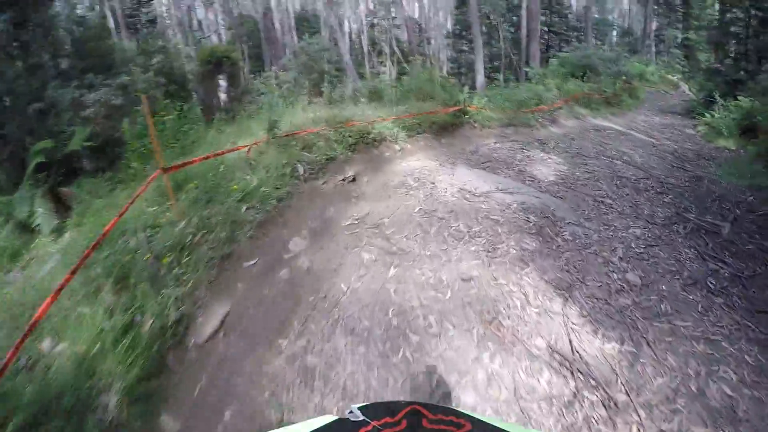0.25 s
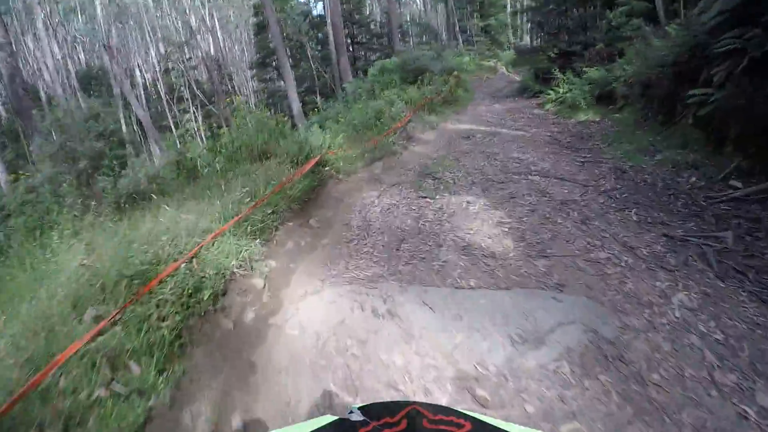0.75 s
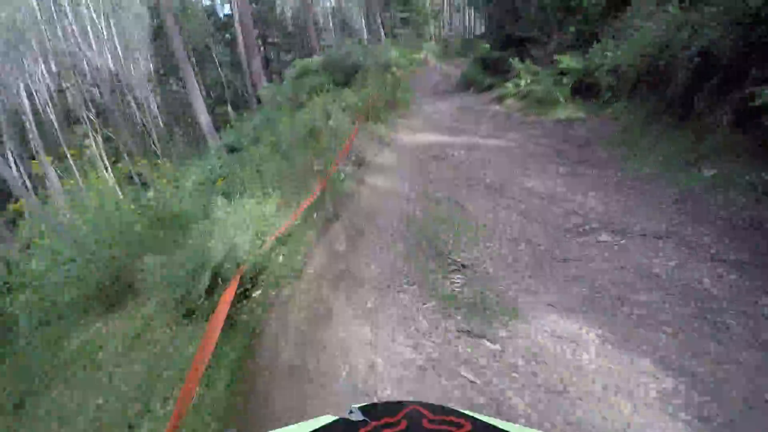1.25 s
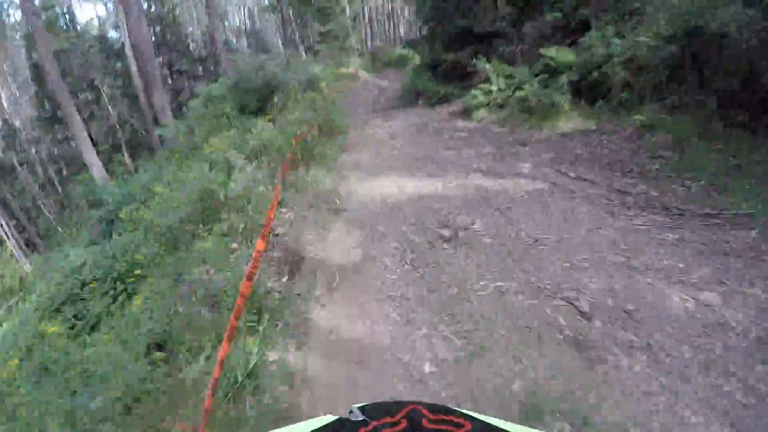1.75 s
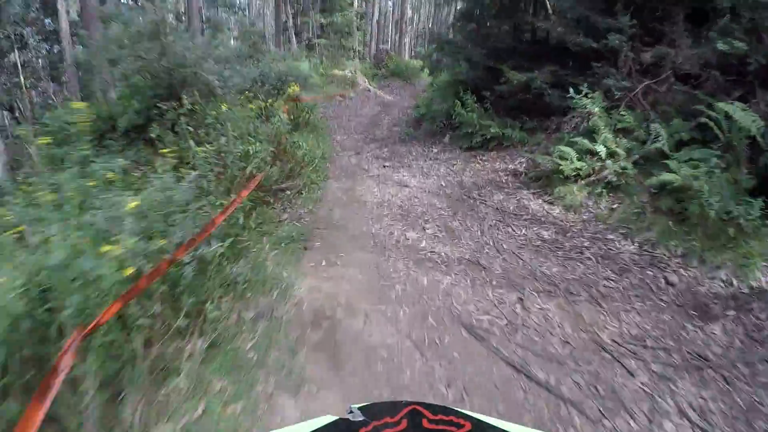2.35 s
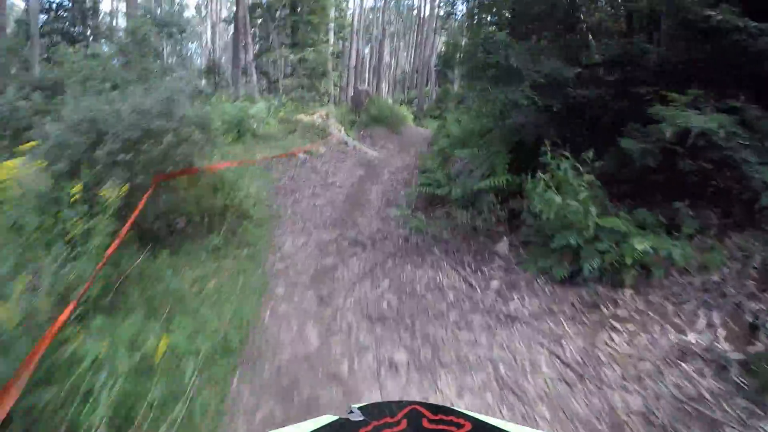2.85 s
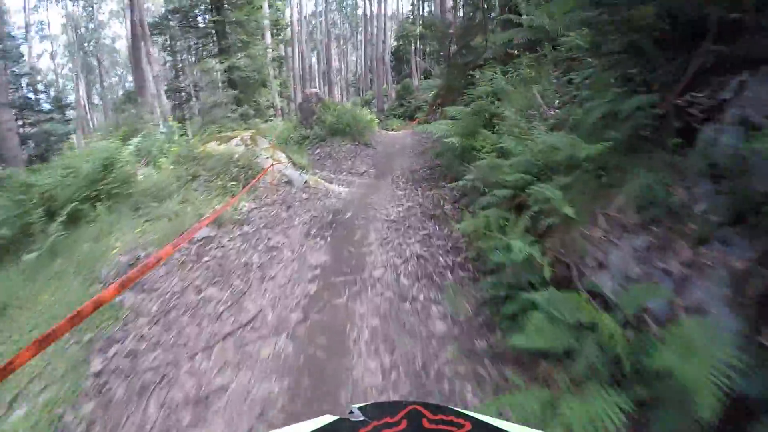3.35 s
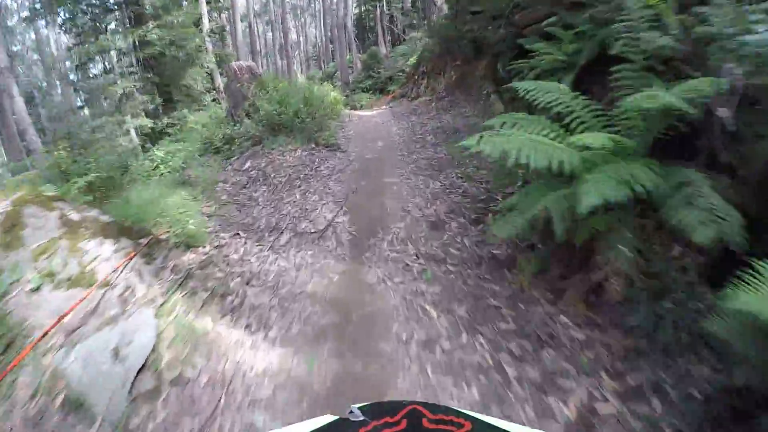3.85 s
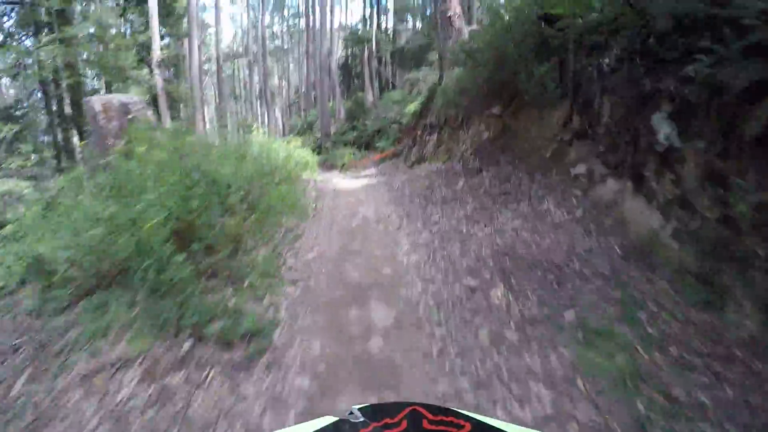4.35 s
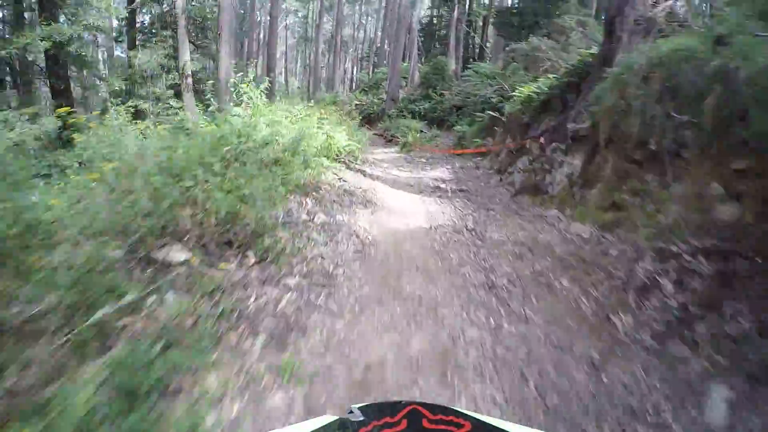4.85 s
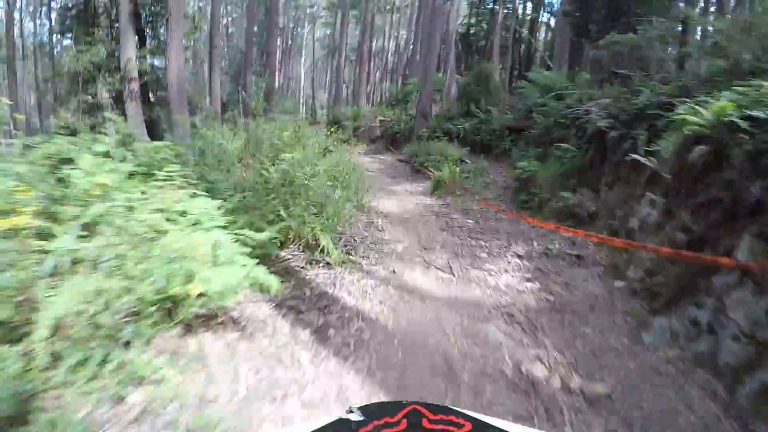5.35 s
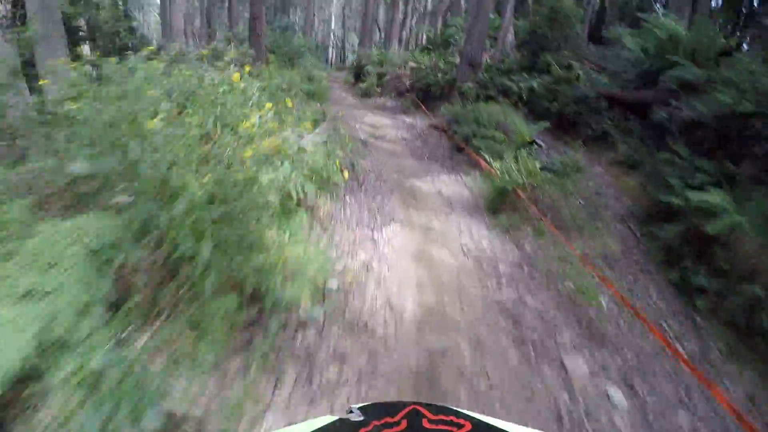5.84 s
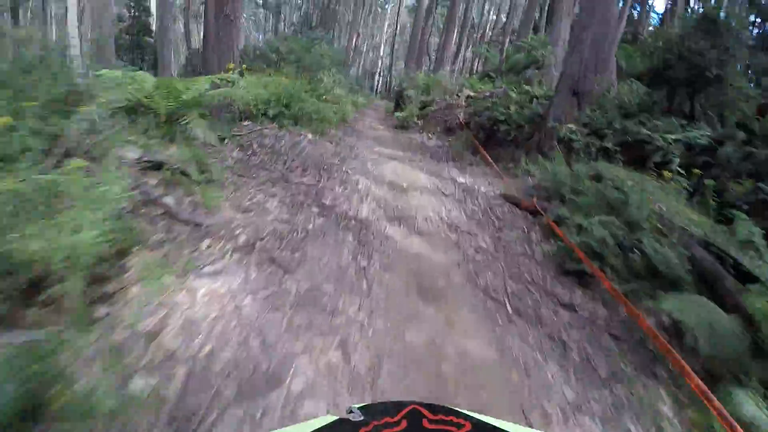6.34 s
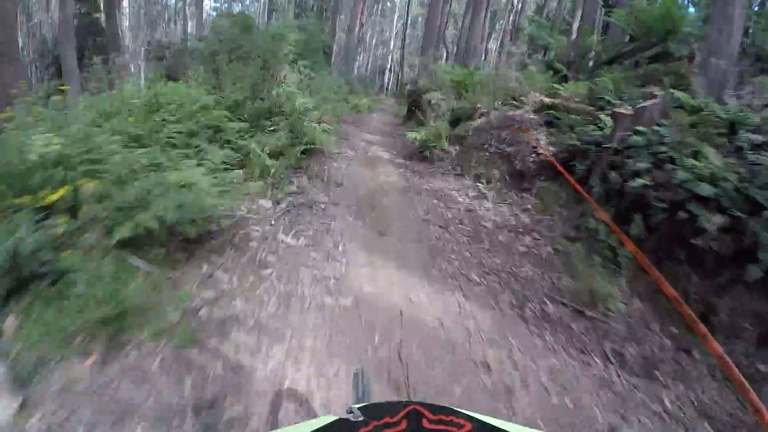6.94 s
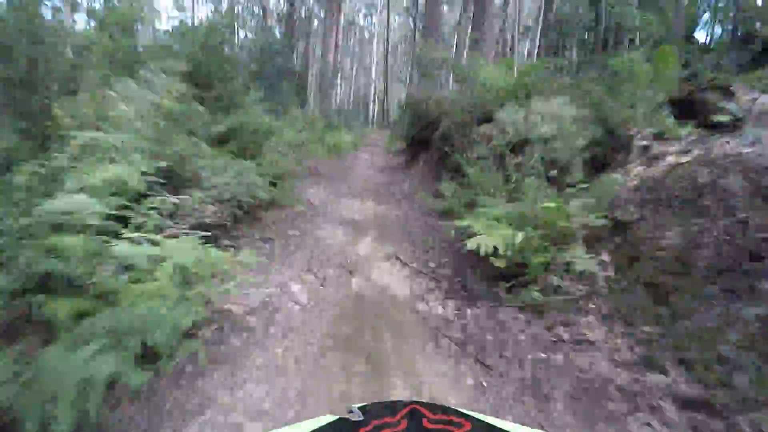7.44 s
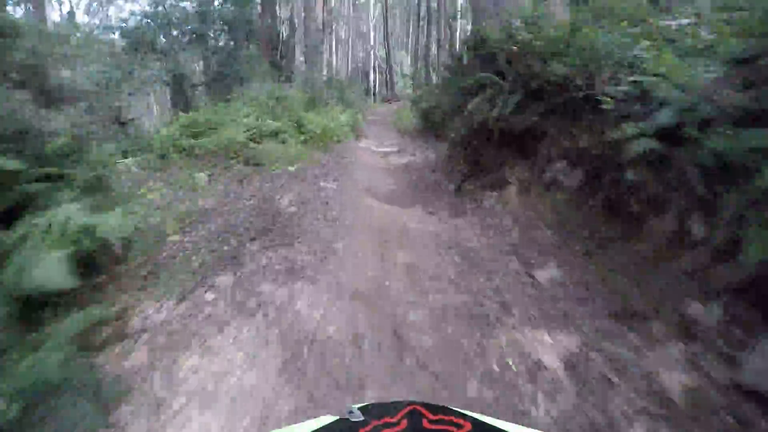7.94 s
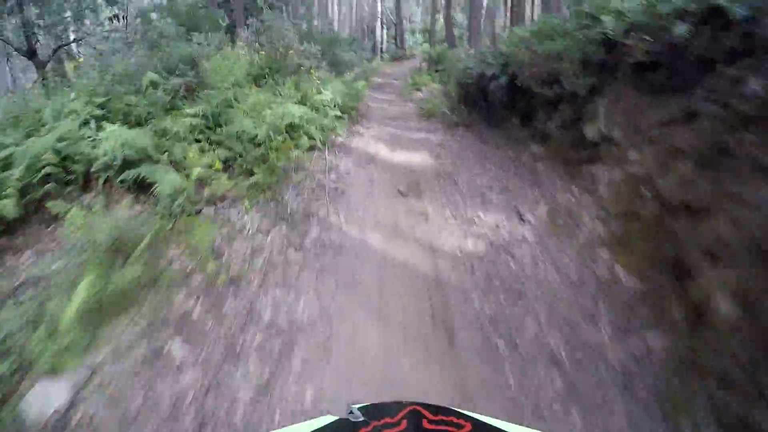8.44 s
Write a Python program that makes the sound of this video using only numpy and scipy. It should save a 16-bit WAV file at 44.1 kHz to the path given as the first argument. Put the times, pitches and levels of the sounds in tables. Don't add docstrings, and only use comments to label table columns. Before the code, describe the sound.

Low muffled rumbling and rising airy hiss on a fast dirt-trail bike ride, early frame knocks and grit ticks, then a loud bright snap past midway.

```python
import sys
import numpy as np
from scipy import signal
from scipy.fft import rfft, irfft, next_fast_len
from scipy.io import wavfile
from scipy.ndimage import uniform_filter1d, map_coordinates

SR = 44100
rng = np.random.default_rng(int(sys.argv[2]) if len(sys.argv) > 2 else 0)


def ratio_of_db(decibels):
    return 10 ** (np.asarray(decibels, float) / 20)


def wav_record(signal):
    frames = np.transpose(np.atleast_2d(signal))
    bounded = np.clip(frames, -1, 1)
    quanta = np.round(bounded * 32767).astype(np.int16)
    wavfile.write(sys.argv[1], SR, quanta)


N = 383229

# (time [s], air stream in the port [dB], head turn as fizz over the stream [dB])
RIDE = [(0, -54, -8), (.35, -62, -6.5), (.9, -61.5, -12), (1.1, -54, -15), (1.7, -42, -18.5),
        (1.95, -40.5, -20.5), (2.5, -37, -20), (3.0, -31, -20), (4.48, -34.5, -19), (4.56, -37.5, -19.5),
        (5.3, -33.5, -15.5), (5.45, -30.5, -15.5), (6.2, -27, -15.5), (6.5, -27.5, -15), (6.9, -33, -15.5),
        (7.4, -23.5, -18.5), (8.0, -22.5, -18.5), (8.69, -27, -16.5)]
# (time [s], level over it [dB], half length [s])
GUSTS = [(.05, -7, 0.034), (.2, 2, 0.047), (.43, 9, 0.015), (.51, 11, 0.046), (.79, 6, 0.1),
         (1.08, 7.5, 0.08), (1.17, -4, 0.026), (1.26, 7.5, 0.053), (1.58, 2.5, 0.024), (1.69, -6, 0.07),
         (2.04, 3.5, 0.054), (2.5, 3.5, 0.13), (2.77, -3, 0.23), (3.5, 2.5, 0.045), (3.72, 1.5, 0.049),
         (4.06, -1, 0.039), (4.32, 6, 0.18), (4.4, -3.5, 0.027), (4.47, 4.5, 0.021), (5.84, -3, 0.15),
         (5.96, 4, 0.032), (6.21, 2.5, 0.098), (6.57, -2, 0.064), (7.53, 4, 0.068), (7.65, -4.5, 0.041),
         (7.81, -2.5, 0.027), (7.92, 4, 0.048), (8.26, -3, 0.028), (8.49, -4, 0.039), (8.58, 3.5, 0.035),
         (2.25, -1, 0.082), (2.91, 1.5, 0.034), (3.87, 1.5, .05), (4.83, 1.5, 0.17), (5.01, 1, 0.089),
         (5.4, 2.5, 0.044), (6.8, 0, 0.08), (7.07, -2.5, .06), (7.3, 0.5, .05), (8.17, 2, 0.039),
         (8.33, 0.5, .05), (1.36, 2, .04), (6.05, 1, .03), (6.42, 2.5, 0.045)]

# (frequency [Hz], density [dB per Hz])
SWAY_SPECTRUM = [(2, -14), (5, -0.5), (12, -1.5), (20, -0.5), (28, 0), (40, -5), (50, -8.5), (60, -26),
                 (75, -46)]
# (time [s], level over rest [dB], half length [s])
SWINGS = [(0, 14.5, 0.0075), (.25, -13, 0.055), (.36, 8.5, 0.022), (.46, 11.5, 0.03), (.6, 8.5, 0.015),
          (1.09, 6, 0.029), (1.23, 5, 0.069), (1.38, 5.5, 0.036), (1.52, 12, 0.031), (2.07, 10.5, 0.027),
          (2.71, 10, 0.03), (3.02, 6, 0.038), (3.36, 7.5, 0.024), (4.08, 11.5, 0.042), (4.33, 5, 0.16),
          (4.81, 11, 0.034), (1.82, 3.5, 0.11), (5.38, 9, 0.031), (5.72, 4, 0.11), (5.95, 13, 0.018),
          (6.12, 7, 0.024), (6.24, 16, 0.01), (6.43, 11, 0.047), (6.69, 9.5, 0.046), (6.85, 17, 0.0076),
          (7.22, -15.5, 0.26), (7.46, 17.5, 0.055), (7.96, 11, 0.032), (8.2, 9, 0.026), (8.62, 7.5, 0.038),
          (.69, -3.5, 0.036), (1.55, -3.5, 0.045), (3.15, -6, 0.092), (3.45, 2.5, 0.036), (3.63, -6, 0.063),
          (4.65, -4, 0.055), (5.19, 0.5, 0.039), (5.61, 1.5, 0.035), (6.28, -0.5, 0.028), (6.08, -3, 0.033),
          (7.2, 3.5, .03), (8.56, 2.5, 0.027), (7.35, 9, 0.02), (2.2, 2, 0.023), (8.39, 4, 0.042)]
# (time [s], level [dB])
PAUSES = [(.05, -7), (.65, -8), (.99, -13), (1.14, -11), (1.31, -7.5), (1.6, -7), (2.13, -6), (2.27, -16),
          (2.35, -4), (2.49, -19), (2.63, 9), (2.66, -16), (3.32, -12), (3.43, -9), (3.48, 1.5),
          (3.87, -11), (4.16, -6), (4.55, -17), (4.67, 6.5), (4.76, -17), (4.94, -13), (5.08, 4),
          (5.91, -22), (6.9, -5), (6.97, -13), (7.04, 11), (8.08, -17), (8.3, -9), (8.38, 5), (8.47, -11)]
PAUSE_S = 0.026
STROKE = .72
# (frequency [Hz], width [Hz], level [dB])
MOUNT_MODES = [(89.2, 21, 0.5), (78, 44, -1), (62.4, 40, -3), (50.5, 18, -8.5)]
# (time [s], level over rest [dB], half length [s])
BUMPS = [(.09, -17, 0.044), (.24, 3, .04), (.44, 19, 0.11), (8.5, -1, 0.044), (1.35, 2.5, 0.14),
         (1.72, 7.5, 0.032), (2.09, 9, 0.056), (2.22, 4.5, .04), (2.39, 6.5, 0.1), (2.54, 10.5, 0.04),
         (2.98, 6.5, 0.11), (3.15, 2, .04), (3.27, 7, 0.042), (3.82, 9, 0.098), (4.31, 4, 0.068),
         (4.45, 23, 0.027), (4.55, -4, 0.034), (5.55, 4, 0.11), (5.95, 12, 0.055), (6.22, 14, 0.029),
         (6.5, 0, 0.13), (6.66, 12, 0.11), (6.85, 12, 0.028), (7.0, -6, 0.041), (7.28, 7, 0.078),
         (7.45, 15.5, 0.062), (7.71, 9, 0.021), (7.89, 14, 0.024), (8.18, 3, 0.027), (8.37, 17, 0.035),
         (.33, -10, .04), (.63, -6, 0.043), (1.05, -10, 0.066), (1.53, 0.5, 0.046), (7.54, 6, 0.066),
         (3.63, 2, 0.051), (4.9, 2.5, 0.18), (5.1, 5, .06), (5.4, 1, .04), (2.75, 2, 0.081),
         (8.02, -2, .04), (8.62, -3, .04), (4.08, 0, .04), (1.22, 6, .04), (8.53, 7, 0.055),
         (3.93, 0, 0.042)]
# (frequency [Hz], density [dB per Hz])
ROAR_SPECTRUM = [(68, -63), (115, 6.5), (123, -0.5), (312, -9.5), (415, -9.5), (570, -13.5), (900, -19.5),
                 (1170, -11), (1980, -120)]
# (time [s], level [dB], half length [s])
CROSSWIND = [(2.99, -5.5, .04), (6.03, -1.5, .05), (1.9, -5, .04), (2.85, 3.5, .05), (5.0, 3.5, 0.044),
             (4.22, 0, 0.046), (7.33, 6, 0.16), (0.37, 5, 0.068), (.24, -4, .05), (1.72, 1, 0.033),
             (2.1, -2, 0.04), (2.39, 0, 0.037), (3.4, 1, .06), (2.7, -7, 0.033), (3, 6, 0.044),
             (5.3, 3.5, 0.072), (5.7, -2.5, 0.037), (5.2, 2, 0.052), (6.9, -0.5, 0.18), (6.9, -2, .05),
             (8.18, 3.5, 0.046), (8.25, -6, 0.043), (8.69, 2, .06), (0.63, 2, .06), (1.35, 0, 0.052),
             (2.25, 0, .04), (3.63, 0, .06), (4.05, 2, 0.11), (4.17, -1.5, .05), (7.2, 2.5, .04),
             (8.0, 0, 0.065), (5.4, -2, .02), (4.8, 1, .05), (5.27, -2.5, 0.07), (3.1, 2.5, 0.066),
             (4.5, -5, .04), (7.78, 0.5, 0.045), (3.9, 0, 0.051), (1.47, -3, .08)]

# (frequency [Hz], density [dB per Hz])
SHELL_SPECTRUM = [(410, -21), (700, -14), (991, -11.5), (1080, -9), (1450, -7), (1770, -2), (2260, 1),
                  (2720, -3), (2800, -34), (3640, -7), (6160, -120)]
# (frequency [Hz], width [Hz], level [dB])
PORT_MODES = [(3161, 460, 1), (3447, 425, 1.5)]
# (frequency [Hz], density [dB per Hz])
FIZZ_SPECTRUM = [(3600, -23), (4050, -9), (4300, 3), (5000, 3), (6200, -3), (7200, -6), (8200, -10.5),
                 (8900, -14.5), (9600, -41)]
# (frequency [Hz], density [dB per Hz])
AIR_SPECTRUM = [(8300, -14), (8900, 11.5), (9800, 7.5), (10500, 1), (11600, 3), (12600, 1), (13600, -5),
                (15100, -13), (15300, -38)]
# (frequency [Hz], width [Hz], lift [dB])
SLOT_MODES = [(4370, 370, 2.5), (4780, 100, -9), (5620, 190, 4.5), (6400, 150, -9), (7880, 410, -4.5),
              (10540, 240, 9.5), (12600, 500, -3)]
# (time [s], level [dB], half length [s])
GLANCES = [(1.27, 3, .05), (2.05, 1, .15), (2.6, -0.5, .15), (5.05, 0, .1), (1.35, 3, .05), (2.25, 4, .06),
           (3.57, -1.5, .08), (4.35, 1.5, .05), (4.83, 2, .06), (5.79, 0, 0.042), (6.3, 1, 0.18),
           (6.53, -3, .04), (6.81, 2, 0.066), (6.95, -0.5, .06), (7.35, -2.5, 0.078), (7.75, 1, .06),
           (8.25, -1, .1), (8.5, 0.5, .05)]

# (frequency [Hz], density [dB per Hz])
TREAD_SPECTRUM = [(500, -19), (1000, -5.5), (1500, -6), (1850, 4), (2050, -3), (2300, 2), (2600, 3),
                  (2850, -8), (3400, -11), (4000, -16.5), (6500, -30)]
# (time [s], level over rest [dB], half length [s])
CRUNCH = [(0, 10, 0.043), (.13, 7.5, 0.11), (.44, 9, 0.043), (.52, 10.5, .04), (.61, 9, 0.035),
          (.71, 7, 0.047), (1.27, 15, 0.058), (1.75, 15.5, 0.058), (6.62, 15.5, 0.2), (7.07, 14.5, 0.5),
          (7.56, 6, .06), (.08, 2.5, .03), (1.07, 3, .05), (.36, -5, .03), (8.25, 6, .06), (.8, 4, .04)]
# (time [s], peak [dB], upper modes [dB])
KNOCKS = [
    (0.112, -40, -2),
    (0.4155, -51, 6),
    (.51, -49, -6),
    (0.4474, -61, 1),
    (0.627, -57, 11.5),
    (0.6773, -39.5, -1.5),
    (0.897, -39, 3),
    (1.0001, -41.5, 2),
    (1.3117, -50, 6),
    (1.9033, -43, 2),
]
# (frequency [Hz], level [dB], decay t60 [s])
FRAME_MODES = [(1130, 6.5, 0.029), (1330, -3.5, 0.016), (1470, 3, 0.016), (1850, 2, 0.013),
               (2090, 6.5, 0.016), (2500, 2, 0.011), (4080, -9, 0.015)]
# (time [s], peak [dB], centre [Hz], decay t60 [s])
GRIT = [(.19, -51, 4530, .02), (.2204, -51, 4470, .04), (.348, -53, 4200, .03), (.43, -37, 2800, .025),
        (0.441, -46, 5000, .04), (0.446, -34, 2500, 0.034), (.4698, -54, 6000, .036),
        (.482, -48, 7000, 0.022), (0.489, -39, 4300, 0.042), (.493, -57, 11000, .05),
        (.221, -35, 2240, 0.022), (.541, -55, 6000, .02), (0.643, -43, 3800, .02), (.9238, -49, 4700, .03),
        (.27, -57, 6000, .02), (.79, -62, 7000, .015), (.865, -59, 7500, .015), (.997, -42, 1900, .012),
        (1.002, -56, 6500, .015), (1.059, -58, 5500, .02), (1.1243, -57, 7000, .015),
        (1.515, -57, 8000, .015), (1.554, -53, 5530, .015), (1.7434, -56, 5200, .04),
        (1.8706, -53, 5500, .015), (2.0862, -46, 4700, .02), (2.2638, -50, 5500, .015),
        (2.3974, -51, 5500, .015), (1.08, -53, 5000, .04), (1.49, -55, 7000, .02), (1.575, -57, 6500, .04),
        (1.6232, -52, 5500, .015), (1.6901, -51, 6000, .015), (1.7858, -42, 5460, .015),
        (1.8277, -49, 8500, .015), (1.8916, -48, 6000, .015), (2.0867, -49, 7000, .021),
        (2.3111, -54, 12000, 0.011), (2.7272, -53, 8900, .03), (2.94, -59, 9000, .03),
        (.93, -61, 9000, .02), (1.29, -54, 6000, .03), (6.77, -60, 14000, .02), (3.2485, -40, 5900, .017),
        (4.358, -41, 6000, .02), (4.3849, -41, 6000, .02), (4.4694, -54, 6960, .026),
        (8.572, -26, 9750, 0.0053)]
# (time [s], peak [dB], length [s])
JOLTS = [(0.416, -13, 0.0044), (0.471, -16, 0.0057), (0.856, -36, 0.0021), (2.04, -29, 0.003),
         (2.498, -27, 0.0029), (4.36, -42, 0.0039), (4.452, -19, 0.0032), (5.395, -23, 0.0028),
         (6.648, -19.5, 0.0036), (6.743, -26.5, 0.001), (6.845, -29, 0.00096), (7.451, -21, 0.0024)]
# (time [s], level [dB], half length [s])
RUBS = [
    (1.268, -68, .052),
    (1.835, -68, .012),
    (2.235, -73, 0.06),
]
# (frequency [Hz], level [dB], decay t60 [s])
CAP_MODES = [(4830, 4.5, 0.0036), (6900, 6.5, 0.0025), (7900, 3.5, 0.003), (11000, -3.5, 0.0025),
             (13700, 1, 0.0024), (16100, -12, .004)]

SPARSE_HZ, TOP_HZ = 11000, 15250
STARVED_HZ = 10300
# (time [s], half length [s])
STARVED = [(.12, .06), (.33, .03), (.47, .015), (.54, .02), (.62, .02), (.72, .06), (.89, .05), (1.06, .05),
           (1.18, .03), (1.23, .06), (1.485, .015), (1.69, .015), (1.81, .02)]


def unit(x):
    return x / np.sqrt(np.mean(x ** 2) + 1e-20)


def along(points, hz):
    f, v = np.transpose(points)
    return ratio_of_db(np.interp(np.log(hz + 1), np.log(f + 1), v, -120, -120))


def curves(rows):
    s, *cols = np.transpose(rows)
    return [np.interp(np.arange(N) / SR, s, c) for c in cols]


def swells(rows):
    t = np.arange(0, N + 32, 32) / SR
    bells = sum(db * np.exp(-((t - s) / length) ** 2) for s, db, length in rows)
    return np.interp(np.arange(N) / SR, t, bells)


def wobble(rate):
    return map_coordinates(rng.standard_normal(N // 100), [np.arange(N) * rate / SR])


def filtered(x, response):
    m = next_fast_len(N + SR // 2)
    return irfft(rfft(x, m) * response(np.fft.rfftfreq(m, 1 / SR)), m)[:N]


def peaks(modes, f):
    return sum(ratio_of_db(db) * 1j * f * w / (c * c - f * f + 1j * f * w) for c, w, db in modes)


def patches(shape, bands, frames):
    field = uniform_filter1d(rng.standard_normal(shape), size=bands, axis=0)
    return unit(uniform_filter1d(field, size=frames, axis=1))


def rush(response, patchy_db=0., even=0.):
    z = signal.stft(rng.standard_normal(N + 512), nperseg=256)[2]
    noise = signal.istft(z * ratio_of_db(patchy_db * patches(z.shape, 5, 8)), nperseg=256)[1][:N]
    x = unit(filtered(noise, response))
    if even:
        envelope = np.abs(signal.hilbert(x, next_fast_len(N))[:N])
        x = filtered(x / (envelope + .25) ** even, lambda f: np.abs(response(f)) ** .3)
    return unit(x)


def add(track, s, sound):
    part = track[round(s * SR):][:len(sound)]
    part += sound[:len(part)]


def speed():
    return curves(RIDE)[0] + 35


def head_sway():
    pauses = [(s, db, PAUSE_S) for s, db in PAUSES]
    level_db = -16.5 + 0.066 * speed() + swells(SWINGS + pauses)
    sway = rush(lambda f: along(SWAY_SPECTRUM, f), even=.9)
    stopped = STROKE * np.tanh(ratio_of_db(level_db - 0.4) * sway / STROKE)
    return filtered(stopped, lambda f: 1 / (1 + (f / 62) ** 8))


def mount_ring():
    level_db = -36 + 0.24 * speed() + swells(BUMPS)
    ring = rush(lambda f: peaks(MOUNT_MODES, f) ** 2 / (1 + (f / 100) ** 16), even=0.41)
    return filtered(ratio_of_db(level_db) * ring, lambda f: 1 / (1 + (f / 108) ** 14))


def wind_roar():
    level_db = -49.5 + 0.43 * speed() + 0.4 * swells(GUSTS) + swells(CROSSWIND)
    roar = unit(ratio_of_db(0.43 * wobble(30)) * rush(lambda f: along(ROAR_SPECTRUM, f)))
    return ratio_of_db(level_db + 2.5) * roar


def air_stream():
    (stream_db, turn_db), gust_db = curves(RIDE), swells(GUSTS)
    port_db = stream_db + gust_db
    shell_db = -37.5 + 0.71 * speed() + 0.62 * gust_db - port_db
    fizz_db = turn_db + (0.73 - 1) * gust_db + swells(GLANCES)
    eddies = 0.32 * wobble(23) + 2.0 * wobble(60) + 1.0 * wobble(200)

    def bursts(depth, response, patchy_db):
        return unit(ratio_of_db(depth * eddies) * rush(response, patchy_db))

    def slots(f):
        return 1 + np.abs(peaks(SLOT_MODES, f))

    shell = bursts(0.24, lambda f: along(SHELL_SPECTRUM, f), -0.5)
    port = bursts(0.37, lambda f: peaks(PORT_MODES, f) ** 2 / (1 + (f / 3900) ** 14), -0.38)
    fizz = bursts(0.34, lambda f: along(FIZZ_SPECTRUM, f) * slots(f), 1.0)
    air = bursts(0.34, lambda f: along(AIR_SPECTRUM, f) * slots(f), 1.2)
    brighter = ratio_of_db(-14.5 + 0.26 * (port_db + fizz_db + 34.0))
    slot_noise = ratio_of_db(fizz_db - 0.02) * (fizz + brighter * air)
    return ratio_of_db(port_db) * (port + ratio_of_db(shell_db + 0.34) * shell + slot_noise)


def preamp_hiss():
    return ratio_of_db(-67.5) * rush(lambda f: f > 300)


def tyre_crunch():
    clumps = ratio_of_db(2.3 * wobble(82) + 2.4 * wobble(300))
    grains = unit(clumps * rush(lambda f: along(TREAD_SPECTRUM, f), patchy_db=0.5))
    return ratio_of_db(-58 + swells(CRUNCH)) * grains


def frame_knocks():
    out, t = np.zeros(N), np.arange(4096) / SR
    rise = 1 - np.exp(-t / 0.00044)
    for s, db, upper_db in KNOCKS:
        ring = np.zeros(len(t))
        for hz, level, t60 in FRAME_MODES:
            mode_db = level + (hz > 1300) * upper_db + rng.normal(0, 1.0)
            ring += rng.choice([-1, 1]) * ratio_of_db(mode_db - 60 * t / t60) * np.sin(2 * np.pi * hz * t)
        add(out, s, ratio_of_db(db + 2.0) * rise * ring)
    return out


def noise_band(hz, width):
    f = np.fft.rfftfreq(4096, 1 / SR)
    return unit(irfft(rfft(rng.standard_normal(4096)) * np.exp(-((f - hz) / width) ** 2)))


def grit_ticks():
    out, t = np.zeros(N), np.arange(4096) / SR
    rise = 1 - np.exp(-t / 0.00022)
    for s, db, hz, t60 in GRIT:
        scratch = noise_band(hz, 0.72 * hz / 2)
        add(out, s, ratio_of_db(db - 60 * t / t60) * rise * scratch)
    return out


def mount_jolts():
    out, t = np.zeros(N), np.arange(4096) / SR
    middle = t[-1] / 2
    for s, db, length in JOLTS:
        u = (t - middle) / max(length, .001)
        add(out, s - middle, -ratio_of_db(db) * (1 - u ** 2) / (1 + u ** 2) ** 2)
    return out


def brake_rub():
    out, t = np.zeros(N), np.arange(4096) / SR
    u = np.arange(2 * len(t)) / SR - t[-1]
    for s, db, length in RUBS:
        squeak = np.tile(noise_band(7850, 480), 2)
        add(out, s - t[-1], ratio_of_db(db) * squeak * np.exp(-(u / length) ** 4))
    return out


def pebble_crack():
    out, t = np.zeros(N), np.arange(SR // 50) / SR
    snap = np.zeros(len(t))
    for k, (hz, db, t60) in enumerate(CAP_MODES):
        snap += (-1) ** k * ratio_of_db(db - 60 * t / t60) * np.sin(2 * np.pi * hz * t)
    falling_hz = 2150 + 3000 * np.exp(-t / 0.0006)
    bend = np.sin(2 * np.pi * np.cumsum(falling_hz) / SR) * np.exp(-((t - .0011) / 0.00081) ** 2)
    back = np.sin(2 * np.pi * 2900 * t) * np.exp(-((t - .0037) / 0.0009) ** 2)
    add(out, 5.88022, ratio_of_db(-1) * (0.55 * snap + .5 * bend + 0.16 * back))
    return out


def patchy_treble(x):
    f, _, z = signal.stft(x, SR, nperseg=1024, noverlap=768)
    height = (f - SPARSE_HZ) / (TOP_HZ - SPARSE_HZ)
    bar = np.where(f > SPARSE_HZ, -2.6 + 2.7 * height, -np.inf)
    gain = ratio_of_db(1.5 * np.clip(height, 0, 1) ** 2) * (f < TOP_HZ)
    kept = (patches(z.shape, 5, 10) > bar[:, None]) * gain[:, None]
    return signal.istft(z * kept, SR, nperseg=1024, noverlap=768)[1][:N]


def starved_treble(x):
    f, t, z = signal.stft(x, SR, nperseg=256, window='cosine')
    short = sum(np.abs(t - s) < length for s, length in STARVED) > 0
    touched = short & (f > STARVED_HZ)[:, None]
    bar = .3 - 1.1 * (TOP_HZ - f) / (TOP_HZ - STARVED_HZ)
    lost = (patches(z.shape, 3, 1) < bar[:, None]) & touched
    return signal.istft(z * ~lost * (1 + .4 * touched), SR, nperseg=256, window='cosine')[1][:N]


def scene():
    wind = head_sway() + mount_ring() + wind_roar() + air_stream() + preamp_hiss()
    bike = tyre_crunch() + frame_knocks() + grit_ticks() + mount_jolts() + brake_rub()
    steady = starved_treble(patchy_treble(wind + bike))
    pebble = filtered(pebble_crack(), lambda f: 1 / (1 + (f / 14900) ** 40 / (1 + (f / 16000) ** 40 / 20)))
    return (steady + pebble)[None]


def roll_off(x):
    return signal.sosfilt(signal.butter(12, 16510, fs=SR, output="sos"), x)


def record(dry):
    top, knee = .97, 14
    clipped = dry[0] / (1 + np.abs(dry[0] / top) ** knee) ** (1 / knee)
    mix = filtered(clipped, lambda f: 1 / (1 + (f / 16450) ** 120))[None]
    return roll_off(mix)


dry = scene()
out = record(dry)
wav_record(out)
```